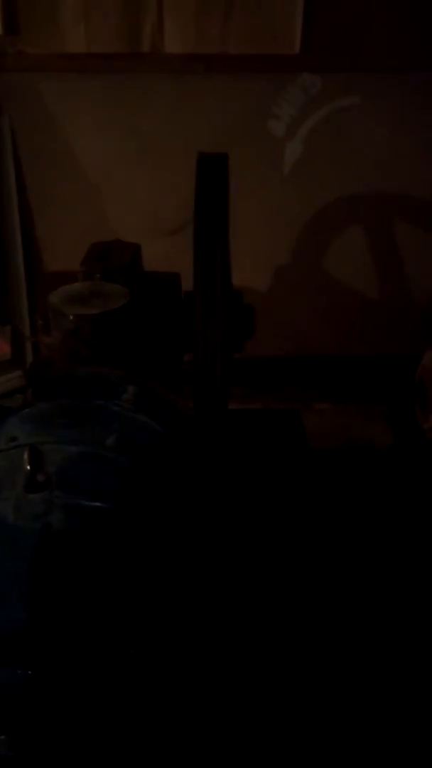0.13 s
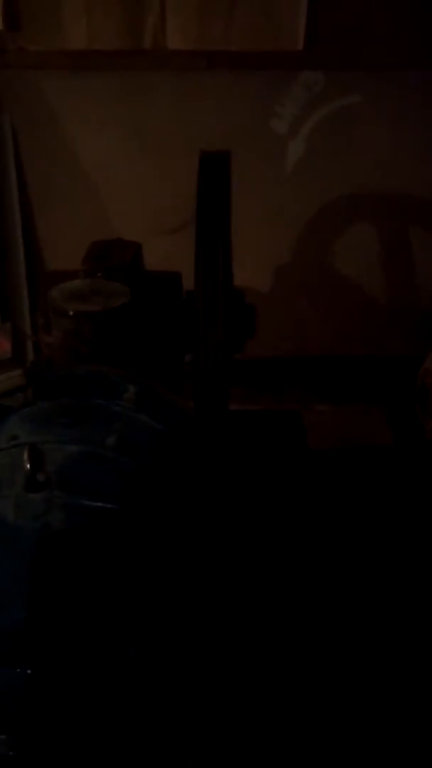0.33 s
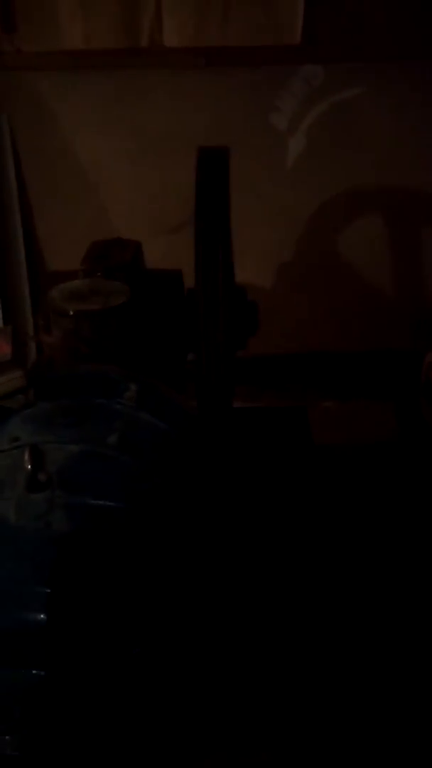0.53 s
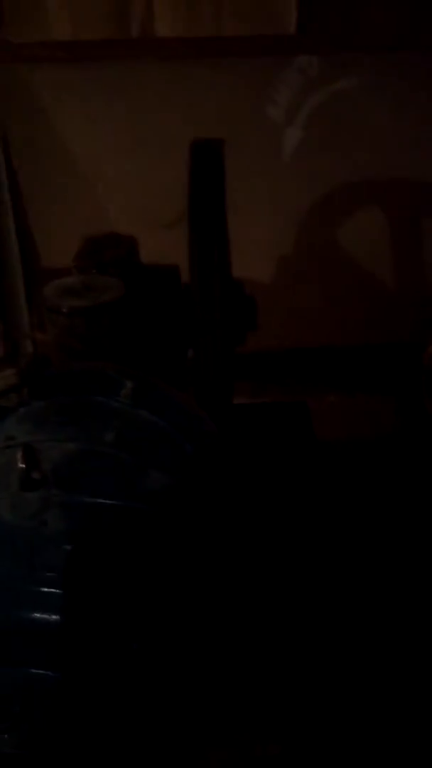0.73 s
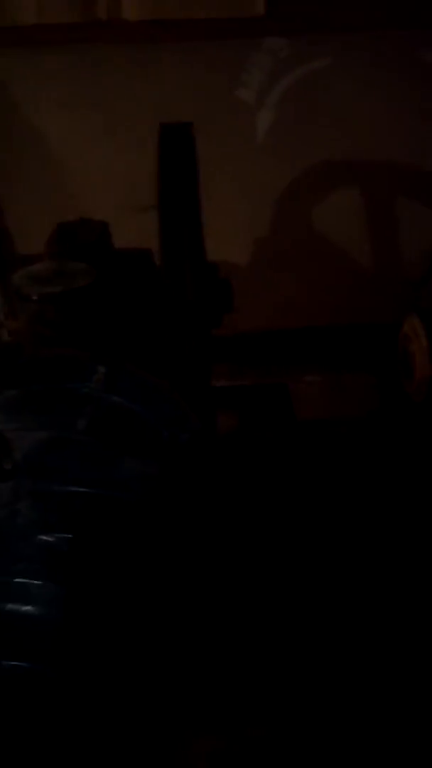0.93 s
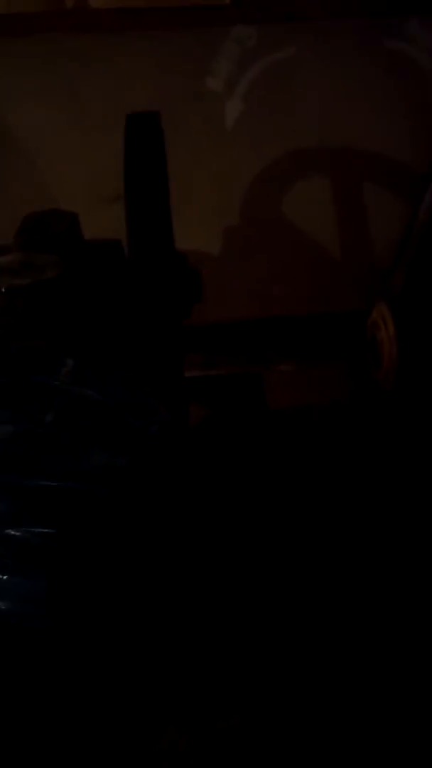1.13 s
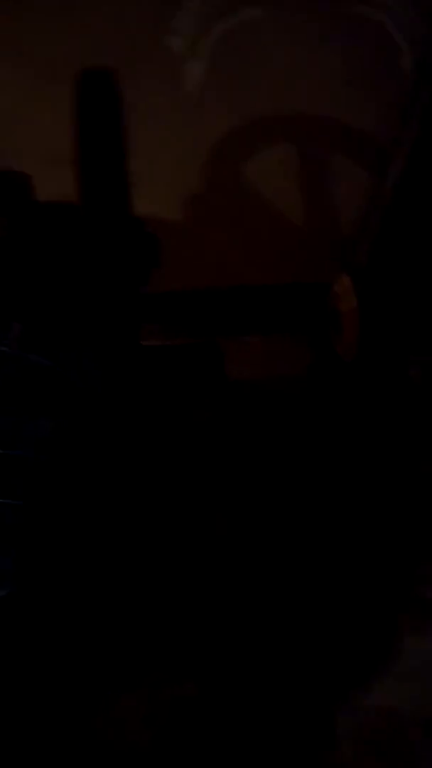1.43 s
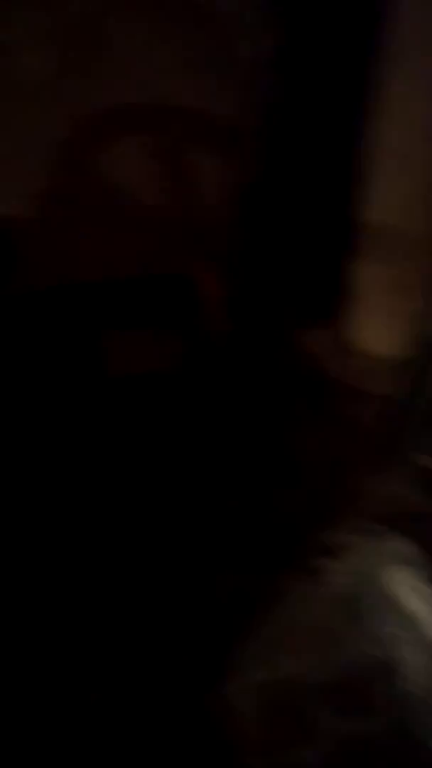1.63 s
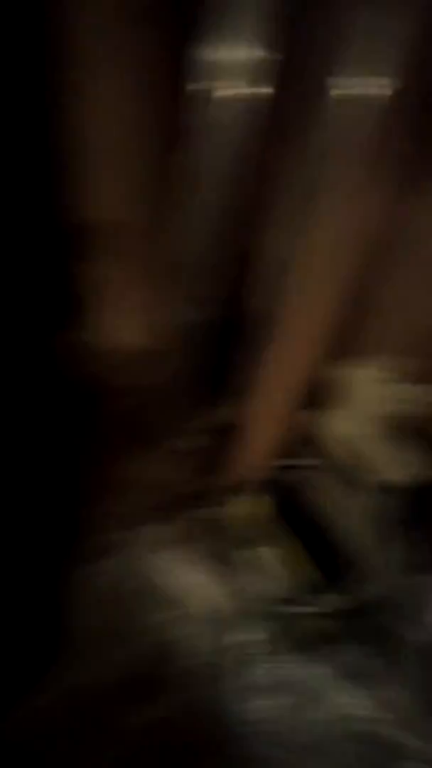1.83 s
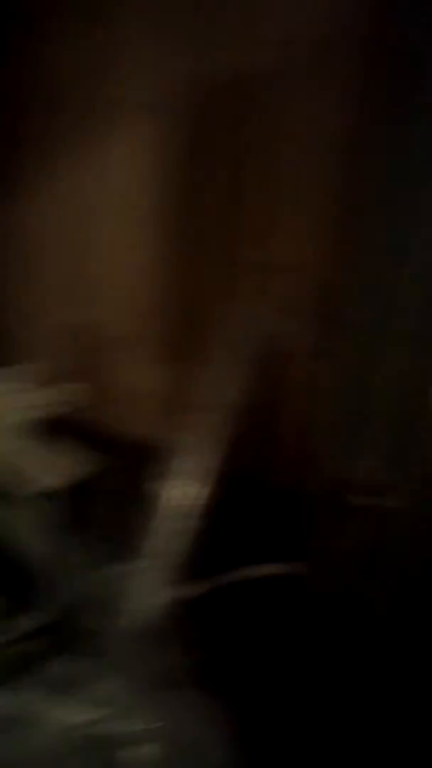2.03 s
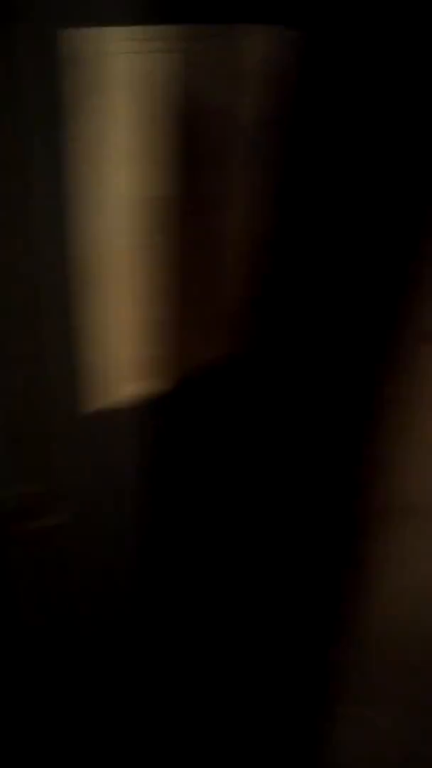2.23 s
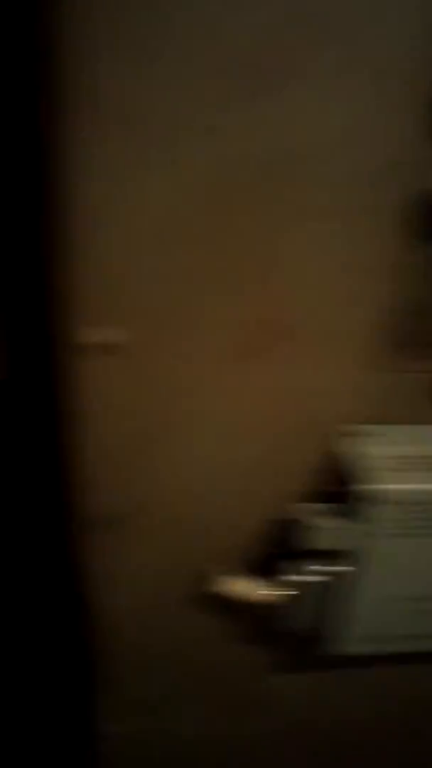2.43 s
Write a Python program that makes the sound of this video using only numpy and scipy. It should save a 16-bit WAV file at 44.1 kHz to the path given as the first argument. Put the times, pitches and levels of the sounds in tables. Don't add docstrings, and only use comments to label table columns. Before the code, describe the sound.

Two loud metallic clacks of lift switchgear ring and echo through a quiet, humming machine room

```python
import sys
import numpy as np
from scipy import signal
from scipy.io import wavfile
from scipy.ndimage import uniform_filter1d

SR = 44100
rng = np.random.default_rng(int(sys.argv[2]) if len(sys.argv) > 2 else 0)


def int16_out(signal):
    q = np.round(np.clip(np.atleast_2d(signal).T, -1, 1) * 32767)
    wavfile.write(sys.argv[1], SR, q.astype(np.int16))


def level_to_linear(level):
    exponent = np.asarray(level, float) / 20
    return 10 ** exponent


N = 114660

# frequency in Hz, width in Hz, level in dB.
CONTACT_MODES = [(2340, 380, -3.5), (4010, 590, -6), (5160, 890, -4.5), (5720, 220, -1.5),
                 (6573, 1600, 2.5), (9070, 49.8, -2.5), (10400, 230, 2.5), (11450, 42.8, 2.5),
                 (12600, 110, 3.5), (14190, 370, 6), (15090, 280, 12.5)]
# frequency in Hz, left-right likeness (-1 to 1).
COHERENCE = [(60, 0.86), (150, 1), (380, 0.63), (950, 0.15), (2380, 0.017), (5980, -0.04), (15000, 0.015)]


def contactor_chatter():
    # start in seconds, peak in dB, pan in dB, rattle decay in seconds.
    bounces = [(0.1664, -30, 2, 0.009), (0.1752, -19.5, 1, 0.009), (0.1943, -13.5, -0.5, 0.0075),
               (0.2029, -5.5, -0.5, 0.0092), (0.2082, -9.5, -2, 0.006), (0.2144, -13, 0.5, 0.0083),
               (0.2301, -10.5, 0.5, 0.009), (0.2517, -8.5, 2, 0.009), (0.2586, -15, -1.5, 0.005),
               (0.2637, -2.5, 2, 0.009), (0.2754, -7, 0.5, 0.01)]
    # frequency in Hz, level in dB.
    tone = [(180, -49), (300, -19), (851, -19.5), (1130, -20), (2010, -17), (2180, -17.5), (5700, -4),
            (8620, -22.5), (15600, -27.5)]
    return blows(bounces, tone, CONTACT_MODES, body_db=-3, level_db=-7.0, wet_db=5.0,
                 rise_s=.0025, gap_s=0.0042)


def brake_slam():
    # start in seconds, peak in dB, pan in dB, rattle decay in seconds.
    slams = [
        (0.2938, -1.5, -4, 0.0094),
        (0.303, 1.5, -6, 0.0069),
        (0.3176, -5.5, -0.5, 0.0057),
        (0.3343, -5.5, -4, 0.01),
        (0.3491, -5, 3, 0.009),
    ]
    # frequency in Hz, level in dB.
    tone = [(59, -48.5), (100, -25), (156, -7), (348, -13.5), (458, -5), (811, -9.5), (4040, -5),
            (6300, -12), (15600, -37.5)]
    # frequency in Hz, width in Hz, level in dB.
    modes = [(170, 60, -2), (286, 44, -2.5), (481, 110, 2), (1320, 170, 0.5), (2794, 680, -1.5),
             (4040, 340, 3.5), (5210, 298, 5.5), (6223, 340, 12), (7460, 200, 0.5), (9160, 49, 6),
             (10090, 230, 14), (11740, 140, 7.5), (13500, 250, 7), (14940, 200, 10)]
    return blows(slams, tone, modes, body_db=5.5, level_db=-11.0, wet_db=7.5, rise_s=0.00045, gap_s=.004)


def frame_thuds():
    # start in seconds, peak in dB, pan in dB, rattle decay in seconds.
    thuds = [
        (.272, -6, 1, .012),
        (.335, -2, -1.5, .015),
        (.845, -7.5, 2, 0.017),
    ]
    # frequency in Hz, level in dB.
    tone = [(60, -30.5), (150, -2.5), (260, -3.5), (340, -10), (480, -3.5), (700, -19), (2000, -50),
            (15600, -80)]
    # frequency in Hz, width in Hz, level in dB.
    modes = [(205, 50, -0.5), (480, 25, 3.5), (508.6, 25, 3)]
    return blows(thuds, tone, modes, body_db=3.5, level_db=-29.5, wet_db=2.5, rise_s=0.0051, gap_s=.006)


def relay_drop():
    # start in seconds, peak in dB, pan in dB, rattle decay in seconds.
    strike = [
        (.8297, 0.5, 0, .011),
    ]
    # frequency in Hz, level in dB.
    tone = [(59, -45.5), (100, -14.5), (185, -12.5), (458, -16.5), (1400, -13), (5550, -3.5), (9610, -16),
            (14700, -29), (15600, -40)]
    return blows(strike, tone, CONTACT_MODES, body_db=4.5, level_db=-7.0, wet_db=7.5)


def latch_ticks():
    # start in seconds, peak in dB, pan in dB, rattle decay in seconds.
    ticks = [
        (.8075, -9, 7.5, .001),
        (.813, -12.5, 1, .004),
    ]
    # frequency in Hz, level in dB.
    tone = [(200, -39.5), (1200, -24), (2800, -18.5), (4000, -7), (6200, -1.5), (7800, -14.5), (10000, -26),
            (15600, -40)]
    return blows(ticks, tone, CONTACT_MODES, body_db=-3, level_db=-5.5, wet_db=6.5)


def metal_cracks():
    # start in seconds, peak in dB, pan in dB, rattle decay in seconds.
    touches = [
        (.3053, -3, -2, .0012),
        (.8074, -13, 6, .0008),
        (.8297, -4, 1.5, .004),
    ]
    # frequency in Hz, level in dB.
    tone = [(300, -40), (1500, -21), (4000, -4.5), (7000, -0.5), (10500, -4), (15000, -8), (16500, -20)]
    return blows(touches, tone, [], body_db=0, level_db=-12, wet_db=-8)


def armature_stir():
    # start in seconds, peak in dB, pan in dB, rattle decay in seconds.
    stirs = [
        (.766, -42.5, -1.5, 0.014),
        (.782, -46.5, 0.5, 0.0088),
        (.796, -41.5, -1.5, .01),
    ]
    # frequency in Hz, level in dB.
    tone = [(300, -40.5), (2500, -12), (4500, -4.5), (6600, -1), (7600, -25), (10000, -36.5),
            (15600, -60.5)]
    return blows(stirs, tone, [], body_db=0, level_db=-3.5, wet_db=5, rise_s=0.0019, gap_s=.005)


def puffs():
    # time in seconds, peak in dB, pitch in Hz, sign of the pressure.
    pushes = [(0.148, -37, 147, 1), (0.187, -28.5, 78.7, -1), (0.501, -30, 122, 1),
              (0.533, -15.5, 97.5, -1), (1.105, -44, 111.8, 1), (1.152, -33, 110, 1),
              (1.386, -19.5, 92, -1), (1.513, -27, 97, 1), (1.558, -34.5, 82.1, -1),
              (1.876, -29.5, 113, -1), (1.916, -10, 108.3, -1), (2.046, -32, 97.2, -1),
              (2.204, -33.5, 83, -1), (2.257, -29, 75, -1), (2.296, -32.5, 57.8, 1), (2.372, -28, 71, 1),
              (2.467, -29, 75, -1), (2.487, -24.5, 98, -1), (2.52, -31.8, 69.6, 1), (2.542, -28.5, 115, 1),
              (2.595, -23.5, 95, 1)]
    rise, fall = 0.45, 0.83
    sag = 0.52
    x, t = np.zeros(N), np.arange(N) / SR
    for s, db, hz, sign in pushes:
        cycles = (t - s) * hz
        shape = np.exp(-(cycles / np.where(cycles < 0, rise, fall)) ** 2)
        swing = np.cos(2 * np.pi * 1.21 * cycles * (1 - sag * np.tanh(cycles)))
        x += np.sign(sign) * level_to_linear(db) * shape * swing
    return x * level_to_linear(np.array([[-56], [0]]))


def draught():
    # frequency in Hz, level in dB.
    buffet = [(12, -46), (20, -8.5), (80, 0.5), (145, -6.5), (177, -12.5), (343, -32), (500, -29),
              (650, -72), (1100, -120)]
    # time in seconds, level in dB.
    strength = [(0, -46), (.3, -43.5), (0.7, -46), (1.2, -45), (1.7, -47.5), (2, -43), (2.3, -43),
                (2.6, -38.5)]
    eddies = noise(buffet, strength, like=0, patchy_db=2, flicker_db=1.5)
    return eddies * level_to_linear(np.array([[-15], [0]]))


def cloth():
    # frequency in Hz, level in dB.
    rustle_tone = [(1500, -18), (2500, -6.5), (3300, -11), (4700, -2.5), (6200, 1), (7200, -19.5),
                   (9000, -36.5), (12000, -38)]
    # time in seconds, level in dB.
    rub = [(1.8, -79), (2.001, -67), (2.201, -61.5), (2.34, -57), (2.4, -55), (2.47, -56.5), (2.55, -56.5),
           (2.6, -61)]
    # frequency in Hz, level in dB.
    swish_tone = [(3000, -39.5), (4300, -12.5), (4700, 1), (5400, -1), (5900, -14.5), (8000, -50)]
    # time in seconds, level in dB.
    stroke = [(2.3, -80.5), (2.37, -61), (2.41, -54), (2.45, -64), (2.5, -78)]
    rustle = noise(rustle_tone, rub, patchy_db=1.2, flicker_db=0.4, size=512)
    swish = noise(swish_tone, stroke, size=512)
    return (rustle + swish) * level_to_linear(np.array([[5], [-3]]))


def motor():
    # frequency in Hz, level in dB.
    tone = [(60, -6), (130, -5), (400, -3.5), (650, -6), (1300, -19), (3000, -40), (5500, -36),
            (8000, -52.5)]
    # time in seconds, level in dB.
    load = [(0, -45), (.15, -45), (.5, -41), (0.749, -53.5), (1.1, -50.5), (1.4, -69), (1.802, -82),
            (2.6, -58)]
    # frequency in Hz, width in Hz, level in dB.
    modes = [(409, 19, -0.5), (636, 21, -6)]
    rumble = noise(tone, load, patchy_db=1.5)
    return colour(rumble, [(10, 0), (20000, 0.00041)], modes, body_db=2.5)


def still_air():
    # frequency in Hz, level in dB.
    tone = [(60, -10), (250, -13.5), (1100, -14.5), (2000, -24.5), (3200, -36), (5500, -28), (6700, -37.5),
            (8000, -56)]
    return noise(tone, [(0, -53.5), (3, -53.5)])


def blows(table, tone, body, body_db, level_db, wet_db, spread_db=3, rise_s=.0001, gap_s=0.0027):
    t = np.arange(4410) / SR
    x = np.zeros((3, N + len(t)))
    for s, db, pan_db, rattle in table:
        size = level_to_linear(spread_db * np.minimum(rng.exponential(1, (2, len(t))), 2))
        bounce = rng.choice([-1., 1.], size.shape) * size * (rng.random(size.shape) < .3)
        bounce = evened(bounce + bounce[::-1] * 0.26)
        bounce = bounce * np.exp(-t / max(rattle, .0005)) * np.tanh(t / rise_s)
        at = round(s * SR)
        sides_db = np.array([[.5], [-.5]]) * np.clip(pan_db, -9, 9)
        x[:2, at:at + len(t)] += level_to_linear(db + level_db + sides_db) * bounce
        x[2, at] += level_to_linear(db + level_db) * np.linalg.norm(bounce[0])
    x = colour(x[:, :N], tone, body, body_db)
    return x[:2] + level_to_linear(wet_db) * room(x[2:], gap_s)


def room(x, gap_s):
    # frequency in Hz, 60 dB decay time in seconds.
    decay = [(150, 1), (400, 0.61), (1040, 0.8), (2760, 0.59), (6000, 0.52), (9000, 0.34), (15000, 0.36)]
    a, b = rng.choice([-1., 1.], (2, SR)) * (rng.random((2, SR)) < .15)
    hz, t, (left, other) = signal.stft(np.array([a, b]), SR, nperseg=256)
    same = np.clip(read(COHERENCE, hz), -1, 1)[:, None]
    z = np.array([left, same * left + np.sqrt(1 - same ** 2) * other])
    z = z * level_to_linear(-60 * t / read(decay, hz)[:, None])
    onset = np.clip(np.arange(SR) / SR / gap_s - .3, 0, 1)
    tail = signal.istft(z, SR, nperseg=256)[1][:, :SR] * onset
    return signal.fftconvolve(x.mean(0)[None], tail / np.linalg.norm(tail[0]), axes=1)[:, :N]


def noise(tone, curve, like=1., patchy_db=1.0, flicker_db=0.5, size=1024):
    hop = size // 4
    frames, hz = N // hop + 5, np.fft.rfftfreq(size, 1 / SR)
    a, b, c, d, patches = rng.standard_normal((frames, len(hz), 5)).T
    patches = evened(uniform_filter1d(uniform_filter1d(patches, 10, 0), 10, 1))
    flicker = evened(uniform_filter1d(rng.standard_normal(frames), 4))
    same = np.clip(like * read(COHERENCE, hz), -1, 1)[:, None]
    left = a + 1j * b
    z = np.array([left, same * left + np.sqrt(1 - same ** 2) * (c + 1j * d)])
    z *= level_to_linear(read(tone, hz)[:, None] + patchy_db * patches + flicker_db * flicker)
    x = evened(signal.istft(z, nperseg=size, noverlap=size - hop)[1][:, :N])
    return x * level_to_linear(along(curve, np.arange(N) / SR))


def colour(x, tone, body, body_db):
    hz = abs(np.fft.fftfreq(8192, 1 / SR))
    bumps = sum(level_to_linear(body_db + db) / (1 + (2 * (hz - f) / w) ** 2) for f, w, db in body)
    gain = np.log(level_to_linear(read(tone, hz)) * (1 + bumps))
    phase = -signal.hilbert(gain).imag
    taps = np.fft.ifft(np.exp(gain + 1j * phase)).real[:4096]
    return signal.oaconvolve(x, taps[None] / np.linalg.norm(taps), axes=1)[:, :N]


def evened(x):
    return x / np.sqrt(np.mean(x ** 2) + 1e-20)


def read(points, hz):
    f, value = np.transpose(points)
    return np.interp(np.log(hz + 1), np.log(f + 1), value)


def along(curve, t):
    return np.interp(t, *np.transpose(curve))


def scene():
    machine = contactor_chatter() + brake_slam() + frame_thuds()
    relay = relay_drop() + latch_ticks() + metal_cracks() + armature_stir()
    handling = puffs() + draught() + cloth()
    return machine + relay + handling + motor() + still_air()


def roll_off(x):
    return signal.sosfilt(signal.butter(12, 15200, fs=SR, output="sos"), x)


def record(dry):
    cut = signal.sosfilt(signal.butter(2, 30, "high", fs=SR, output="sos"), dry)
    return roll_off(np.clip(cut, -.98, .98))


dry = scene()
out = record(dry)
int16_out(out)
```